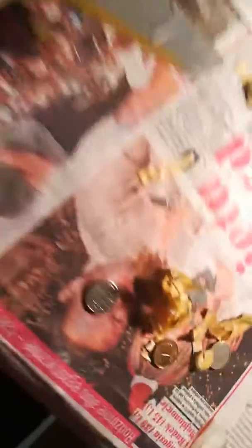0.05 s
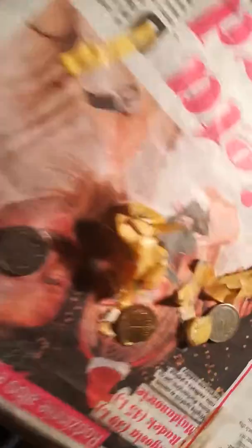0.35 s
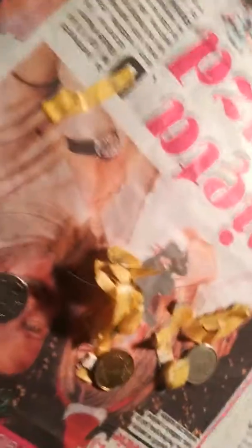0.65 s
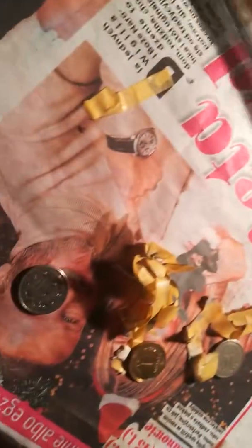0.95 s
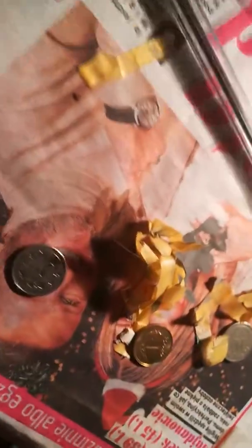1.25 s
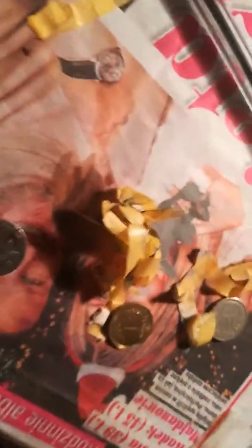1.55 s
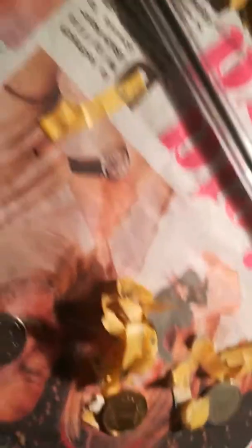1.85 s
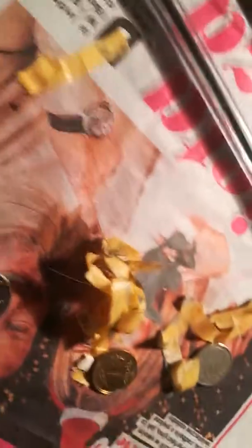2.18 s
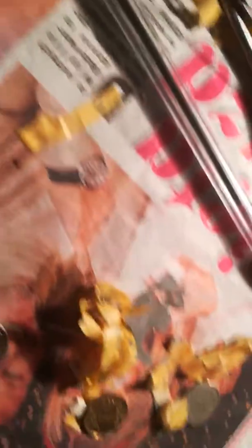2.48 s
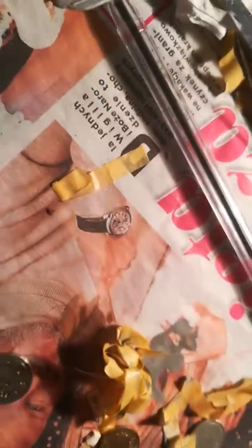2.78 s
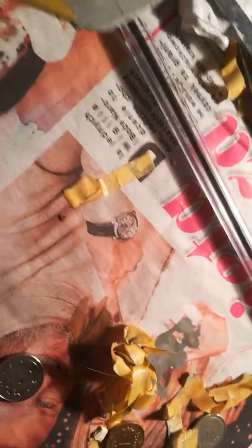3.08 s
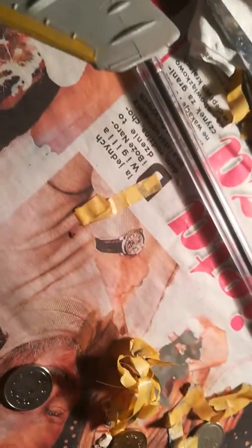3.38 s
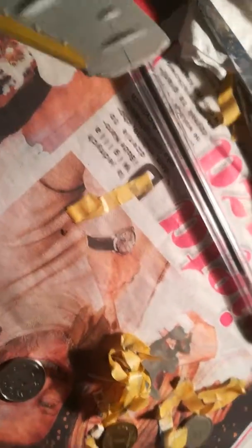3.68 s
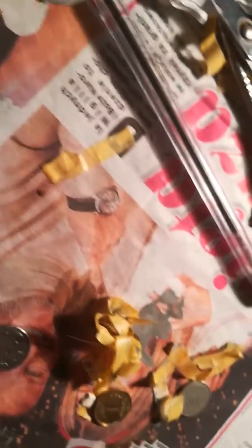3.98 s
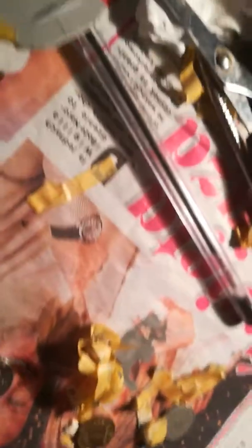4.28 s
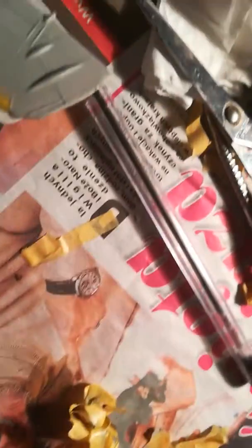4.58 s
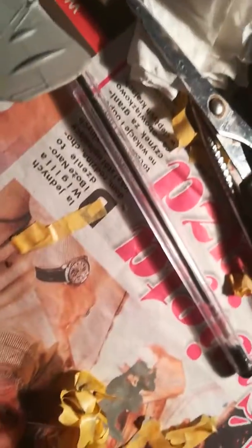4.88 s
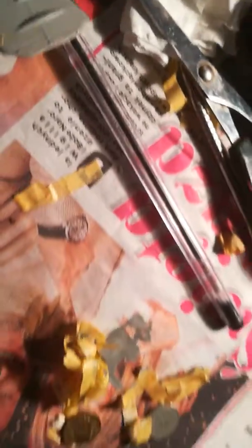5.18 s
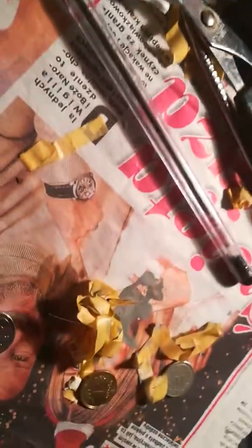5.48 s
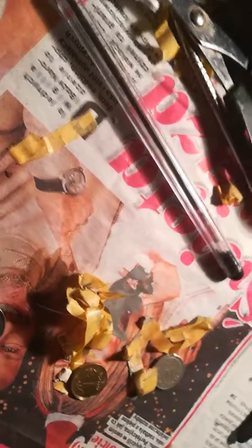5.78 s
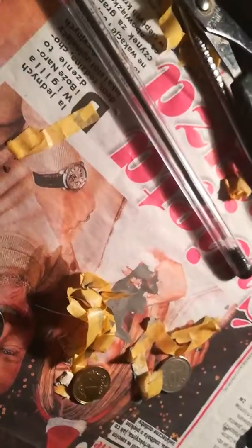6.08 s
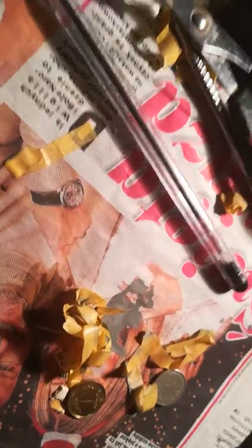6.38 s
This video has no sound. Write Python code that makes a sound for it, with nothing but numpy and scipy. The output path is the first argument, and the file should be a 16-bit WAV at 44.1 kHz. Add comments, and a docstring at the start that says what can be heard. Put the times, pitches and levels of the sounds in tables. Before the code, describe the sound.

Glossy magazine pages slide and crinkle on a workbench in a small room, close to a hand-held phone and brighter on the right. In the first second, soft bumps mix with papery swishes and a sharp crease near 0.9 seconds. Crisp snaps follow around 1.4 and 2 seconds, then irregular crackling continues to about 4 seconds, with a faint low rubbing on the bench. At 4.1 and 4.2 seconds things are set down with two dull thumps. At 4.3 seconds comes one hard knock, the loudest sound, which briefly rings the bench top and rattles small loose objects. The pages rustle on, and another dull thump lands near 5.6 seconds. A few lighter crinkles follow just after 6 seconds, and a small metal tool clinks with a soft bump at about 6.4 seconds. A faint room rumble lies underneath throughout.

```python
"""Glossy magazine pages slide, flex and crinkle on a workbench in a small room, close to a hand-held phone.
Soft bumps open the scene; fibres catch and slip in a hiss, bending sheets crackle and creases snap.
Just after 4 s things are set down: two dull thumps, then one hard knock that rings the bench top.
The pages rustle on, another thump lands near 5.6 s, and at the end a small metal tool clinks.
Throughout, the phone's right port faces the paper; the left one hears it later and duller."""
import sys
import numpy as np
from scipy import signal
from scipy.fft import rfft, irfft
from scipy.io import wavfile
from scipy.ndimage import uniform_filter1d, minimum_filter1d

SR = 44100
rng = np.random.default_rng(int(sys.argv[2]) if len(sys.argv) > 2 else 0)


def transcribe(u):
    """Save the signal u as a 16-bit wav file named by the first command-line argument.

    u: samples, shape (n,) or (channels, n), limited to [-1, 1]; the rate is SR.
    q: integer samples, one column per channel.
    """
    v = np.clip(np.atleast_2d(u).T, -1, 1)
    q = np.round(v * 32767).astype(np.int16)
    wavfile.write(sys.argv[1], SR, q)


N = 288414
TIME = np.arange(N) / SR

# tone of the room's rumble and the ports' hiss: frequency_hz, gain_db
ROOM_TONE_EQ = [(20, 4), (50, 14), (120, 2), (300, -4.5), (600, -18), (1500, -18.5), (3000, -21.5),
                (8000, -22.5), (16000, -25)]

# blows and soft bumps, brighter for hard things than for a hand: start_s, level_db, cutoff_hz
BENCH_HITS = [(0.047, -53, 497), (0.19, -47.5, 160), (0.393, -40, 1010), (0.613, -45.5, 253),
              (0.877, -43.5, 500), (1.031, -47, 67), (3.096, -36, 134), (4.094, -19, 382),
              (4.173, -21.5, 447), (4.291, -9.5, 2390), (4.47, -35, 196), (5.369, -44, 200),
              (5.574, -19.5, 256), (6.392, -36.5, 400), (6.469, -39, 393)]
# modes of the bench top with the things on it: pitch_hz, level_db, t60_s
BENCH_MODES = [(45.6, -9, 0.58), (84, -21, .12), (121.5, 4, 0.23), (181.7, 0, 0.2), (228, -4, 0.15),
               (287.3, -12, 0.22), (403, -1.5, 0.075), (452, -2.5, 0.064), (580, -8.5, 0.06),
               (737, -19.5, 0.065), (925, -20.5, 0.063), (947, -5, 0.11), (1036, -18.5, 0.17),
               (1130, -6, 0.095), (1250, -5.5, 0.015), (1335, -1.5, 0.12), (1346, -12, 0.19),
               (1478, 9, 0.028), (1660, -24, .1), (1810, -6.5, 0.049), (1936, -21, .04)]
# thud of the air a blow pushes: frequency_hz, gain_db
THUD_EQ = [(25, -26), (60, 0.5), (200, -6), (500, -1.5), (1000, 0.5), (1500, -1), (2000, -4.5),
           (2600, -27.5), (5000, -39), (12000, -59.5)]
# rattle of things lying on the bench: frequency_hz, gain_db
RATTLE_EQ = [(100, -15), (300, -4), (600, -29.5), (900, -11.5), (1400, -11.5), (2000, -3.5), (2600, -21.5),
             (5000, -36), (12000, -41.5)]

# light strokes that sing on glossy paper: middle_s, level_db, pitch_hz, half_length_s
LIGHT_STROKES = [(0.071, -59, 5800, 0.022), (3.592, -52.5, 4330, 0.085), (3.817, -50.5, 4040, 0.031)]
# pushes of one sheet over another: start_s, rise_s, length_s, hiss_db, sheen_db
SHEET_PUSHES = [(0.155, 0.056, 0.27, -49, -57), (0.43, 0.071, .16, -50, -55.5),
                (0.59, 0.13, 0.35, -49.5, -58), (1.345, 0.078, 0.14, -46, -56),
                (1.86, 0.0099, 0.074, -59.5, -77), (1.94, 0.051, 0.074, -47, -55),
                (2.98, 0.024, 0.18, -52.5, -69), (3.2, 0.029, 0.093, -61, -77),
                (3.59, .05, 0.1, -54.5, -69.5), (3.77, 0.13, 0.1, -48, -63), (3.94, 0.066, 0.24, -56, -71),
                (4.10, .11, .21, -43.5, -52), (4.36, 0.085, 0.13, -51, -68.5),
                (5.11, 0.037, 0.033, -59, -69), (5.44, 0.063, 0.082, -53.5, -76),
                (5.805, 0.049, 0.088, -57, -68), (5.9, .05, .18, -65.5, -74.5),
                (6.1, 0.055, 0.16, -59, -68)]
# hiss of slipping fibres: frequency_hz, gain_db
HISS_EQ = [(300, -33.5), (700, -16), (1100, -8.5), (2000, -3.5), (3300, 5.5), (5000, 7), (7000, 0.5),
           (9000, -11), (12000, -22), (16000, -38)]
# top-octave sheen of a fast stroke: frequency_hz, gain_db
SHEEN_EQ = [(3000, -33.5), (7000, -9.5), (9300, -7), (11500, -9), (13500, -13.5), (16000, -14)]

# bends of a sheet under the hand: start_s, rise_s, length_s, crackle_db, rub_db
SHEET_BENDS = [(0.17, 0.034, 0.13, -56, -56), (0.33, 0.017, 0.32, -57.5, -61), (0.66, 0.11, 0.27, -60, -67),
               (1.0, .04, 0.11, -74, -65.5), (1.36, 0.035, 0.13, -59.5, -54.5),
               (1.48, 0.028, 0.054, -71, -56), (1.86, 0.069, 0.19, -61, -69), (1.92, 0.046, 0.14, -60, -50),
               (2.05, .04, 0.2, -64, -57.5), (2.185, 0.021, 0.24, -53.5, -52.5),
               (2.44, 0.086, 0.26, -54.5, -71), (2.8, 0.019, .33, -53.5, -57),
               (3.15, 0.056, 0.13, -63, -74), (3.46, 0.049, 0.16, -70, -87), (3.6, .04, .09, -60.5, -64),
               (3.77, 0.026, 0.29, -57.5, -70.5), (3.89, 0.069, 0.37, -49.5, -51),
               (4.33, 0.075, 0.25, -54.5, -52.5), (4.6, 0.038, 0.087, -83.5, -60),
               (4.8, 0.029, .08, -67.5, -78), (4.88, 0.026, 0.11, -61.5, -70),
               (5.02, 0.027, 0.14, -55.5, -57.5), (5.16, 0.064, 0.34, -62.5, -66),
               (5.33, 0.096, 0.2, -50.5, -53), (5.6, 0.035, 0.3, -84, -63.5),
               (6.37, 0.025, 0.081, -57, -53)]
# crackle of a bending sheet: frequency_hz, gain_db
CRACKLE_EQ = [(150, -17), (350, 5.5), (600, -14), (1000, -0.5), (1500, 1.5), (2500, -8), (4000, -11),
              (8000, -35.5), (16000, -34)]
# rumble of the hand rubbing on the bench: frequency_hz, gain_db
RUB_EQ = [(20, -8), (45, -33), (80, 1.5), (125, 9.5), (200, -4), (350, -7.5), (550, -30.5), (1000, -45),
          (4000, -71)]

# loud creases snapping through: start_s, level_db, crisp_db, body_db, facet_hz, length_s
LOUD_CREASES = [(0.2378, -37.5, 2, -8.5, 3270, .006), (0.39, -34.5, 3, 8, 1140, .011),
                (0.5133, -35, 6, -7.5, 3500, .012), (0.8777, -26, -5.5, -8, 1930, .01),
                (0.9503, -40, 12, -24, 2910, .004), (1.408, -30, 14, -3, 4470, 0.02),
                (1.479, -30, 26, -17, 4800, .006), (1.873, -43, 3, -2.5, 2140, 0.026),
                (1.9943, -31.5, 17.5, -4.5, 5220, .011), (2.2012, -38.5, -18, -8, 1630, .009),
                (2.244, -44, -33, 2.5, 1270, .013), (2.329, -43.5, -8, -5, 1190, 0.012),
                (2.388, -44, 22, 15, 1640, .003), (2.4122, -28.5, 0, -1.5, 1210, .011),
                (2.4833, -29, -5.5, -12, 3300, .007), (2.539, -34.5, -6, -1, 1660, .009),
                (2.6285, -32, -15, -5.5, 1690, 0.0062), (2.8513, -31, -1, -3, 2800, .004),
                (2.971, -37, -3, -1, 3250, .005), (3.016, -36.5, -17, -1, 1540, .003),
                (3.038, -34, 11, -2, 4330, 0.01), (3.0527, -33.5, 9.5, -6, 4560, 0.01),
                (3.1067, -31.5, 14, -12, 4460, .009), (3.239, -38.5, -8, -5.5, 3230, .007),
                (3.606, -31.5, 6, -2, 2020, .008), (3.658, -38.5, 11, 0.5, 1750, .009),
                (3.912, -43, -28, -4, 1450, 0.0067), (4.004, -36, -9.5, 5, 1290, .013),
                (4.158, -33, 4.5, 2, 1880, .012), (4.242, -34.5, 13, 5, 1840, 0.01),
                (4.2902, -20.5, 3, 14, 1380, .006), (4.445, -24.5, 10.5, 6, 2120, 0.0053),
                (4.546, -30, -2, 3, 1950, .007), (4.8943, -37.5, 0.5, -1.5, 1480, .006),
                (4.9217, -34, -9, 2, 1490, .015), (4.954, -39, -17, 3, 1520, 0.0025),
                (5.0584, -37.5, -37, 10.5, 1310, .013), (5.108, -35.5, -6, 4.5, 1170, .014),
                (5.368, -43.5, 0.5, 8.5, 3480, .014), (5.4227, -37.5, -12, -12, 2650, 0.014),
                (5.4638, -29.5, 8, -8.5, 1720, .005), (5.638, -41, 0.5, 0, 4180, 0.005),
                (6.104, -48, 16.5, -5, 1720, 0.032), (6.168, -34.5, 23.5, -20, 4490, .006),
                (6.1947, -36, 17, -7, 4960, .007), (6.323, -46.5, 14, 3, 6150, .005)]
# snap common to all creases: frequency_hz, gain_db
SNAP_EQ = [(60, -8), (200, -4), (400, 2), (700, -4), (1200, 4), (2000, -0.5), (3200, 0.5), (4500, 4),
           (6500, -6.5), (9000, -16.5), (12000, -29), (16000, -44)]

# small loose things tapping: start_s, level_db, pitch_hz, t60_s
LOOSE_TAPS = [(1.019, -56.5, 1300, .05), (1.873, -46, 1114, 0.047), (1.882, -42.5, 367, 0.14),
              (3.604, -50.5, 357, 0.12), (4.158, -28, 1960, 0.023), (4.312, -25, 1431, .11),
              (4.339, -27.5, 1371, 0.12), (6.357, -39, 1525, 0.068), (6.367, -52, 1520, 0.04),
              (6.400, -37.5, 205.6, 0.17)]
# touches of the metal tool: start_s, level_db, cutoff_hz
TOOL_HITS = [(6.381, -37.5, 7000), (6.389, -30.5, 11100)]
# modes of the metal tool: pitch_hz, level_db, t60_s
TOOL_MODES = [(1623, 6.5, 0.029), (1690, -14, 0.47), (1980, 0, 0.014), (3560, -14, 0.037),
              (5800, -13, 0.15), (5960, -2.5, 0.13), (7100, -11.5, 0.15), (8500, -9, 0.1),
              (9200, -15, 0.13), (10100, -15, .13)]

# tone of the small room's tail: frequency_hz, gain_db
REVERB_EQ = [(60, -13), (150, -5), (350, -4), (1200, 0.5), (4000, -6), (8000, -4.5), (16000, -8.5)]
# response of the phone's two ports: frequency_hz, left_db, right_db
PORT_EQ = [(104, -7, -4.5), (386, 2.5, -0.5), (785, 9, 7.5), (1374, -7.5, 0), (2380, -2.5, 7),
           (4580, -20.5, -1.5), (8400, -23.5, 1.5), (16000, -13.5, -4)]

SLIDE_T60_S, BEND_T60_S = 0.21, 0.25  # a pushed sheet coasts to rest, a bent one settles
BEND_HISS_DB, BEND_SHEEN_DB = -12.5, -32  # a bending sheet also slips a little, relative to its crackle
PAPER_LAG_S, SLIDE_LAG_S = 0.00055, 0.0005  # the left port hears later


def amp(db):
    """Decibels to gain."""
    return 10 ** (np.asarray(db) / 20)


def unit(x):
    """Scale to rms 1."""
    return x / np.sqrt(np.mean(x ** 2))


def peaked(x, db):
    """Scale a hit so that its loudest 4 ms have this level."""
    return x * amp(db) / np.sqrt(uniform_filter1d(x ** 2, size=176, mode="constant").max())


def fade(t, t60):
    """Exponential decay by 60 dB in t60 seconds."""
    return np.exp(-np.log(1000) * t / t60)


def eq(x, points):
    """Causal filter through (frequency_hz, gain_db) points, by way of the cepstrum."""
    size = 4096
    hz, db = np.transpose(points)
    bins_hz = np.maximum(np.arange(size // 2 + 1) * SR / size, 1)
    gain = amp(np.interp(np.log(bins_hz), np.log(hz), db))
    cepstrum = irfft(np.log(gain))
    cepstrum[1:size // 2] *= 2
    cepstrum[size // 2 + 1:] = 0
    impulse_response = irfft(np.exp(rfft(cepstrum)))
    return signal.fftconvolve(x, impulse_response)[:len(x)]


def soften(x, cutoff_hz):
    """Low-pass: a soft contact pushes for longer and leaves the high modes alone."""
    return signal.sosfilt(signal.butter(2, min(cutoff_hz, .45 * SR), fs=SR, output="sos"), x)


def ring(modes, t):
    """Free ringing of a struck object; neighbouring modes start in opposite directions."""
    return sum((-1) ** k * amp(db) * fade(t, t60) * np.sin(2 * np.pi * hz * t)
               for k, (hz, db, t60) in enumerate(modes))


def grains(count, per_s, spread_db):
    """Tiny slips and buckles at random moments; with spread, most are small and a few large."""
    happens = rng.random(count) < per_s / SR
    sizes = amp(spread_db * np.minimum(rng.exponential(size=count), 4))
    return unit(happens * sizes * rng.choice([-1, 1], count) + 1e-9)


def flutter(per_s, depth_db, count=N):
    """A gain that wanders at random."""
    knots = rng.standard_normal(count)
    return amp(depth_db * np.interp(TIME[:count] * per_s, np.arange(count), knots))


def shifting(x, per_s, depth_db):
    """The contact patch moves, so each half-octave swells and fades on its own."""
    spectrum = rfft(x)
    bins_hz = np.maximum(np.arange(N // 2 + 1) * SR / N, 1)
    half_octaves = np.clip(2 * np.log2(bins_hz / 500), 0, 10)
    bands = (irfft(spectrum * np.maximum(1 - np.abs(half_octaves - k), 0), N) for k in range(11))
    return sum(band * flutter(per_s, depth_db) for band in bands)


def stroke_envelopes(table, t60):
    """Each stroke speeds up, holds and dies away; one envelope for each of the two level columns."""
    power = np.zeros((2, N))
    for start_s, rise_s, length_s, *levels_db in table:
        age = TIME - start_s
        attack = np.sin(np.pi / 2 * np.clip(age / rise_s, 0, 1)) ** 2
        release = fade(np.maximum(age - length_s, 0), t60)
        power += (amp(levels_db)[:, None] * attack * release) ** 2
    return np.sqrt(power)


def add(track, start_s, sound):
    """Mix a sound into a track at its cue."""
    start = max(int(start_s * SR), 0)
    track[start:start + len(sound)] += sound[:N - start]


def room_tone(level_db=-68):
    """A bed of faint room rumble shared by both ports, plus their own hiss."""
    rumble = soften(rng.standard_normal(N), cutoff_hz=350)
    hisses = [eq(rng.standard_normal(N), [(100, -11), (600, 10)]) for _ in range(2)]
    return np.array([amp(level_db) * unit(eq(rumble + hiss, ROOM_TONE_EQ)) for hiss in hisses])


def knocks():
    """Blows push the air, ring the bench top and briefly rattle what lies on it."""
    out, t = np.zeros(N), TIME[:SR]
    body = ring(BENCH_MODES, t)
    thud = peaked(eq(signal.unit_impulse(len(t)), THUD_EQ), db=6)
    for start_s, level_db, cutoff_hz in BENCH_HITS:
        rattle = unit(eq(rng.standard_normal(len(t)), RATTLE_EQ)) * fade(t, t60=.15)
        hit = soften(thud + body + amp(-7.5) * rattle, cutoff_hz)
        add(out, start_s, peaked(hit, level_db + .39))
    return out


def swishes():
    """A light, even stroke slips at a nearly steady rate and swells in one band."""
    out = np.zeros(N)
    for middle_s, level_db, hz, half_length_s in LIGHT_STROKES:
        band = eq(rng.standard_normal(N), [(hz / 1.5, -22), (hz, 0), (hz * 1.5, -22)])
        swell = np.exp(-((TIME - middle_s) / half_length_s) ** 2)
        out += amp(level_db) * unit(band) * swell
    return out


def sliding():
    """Paper on paper: fibres catch and slip thousands of times a second; fast strokes add a sheen."""
    hiss_gain, sheen_gain = stroke_envelopes(SHEET_PUSHES, SLIDE_T60_S)
    bending, _ = stroke_envelopes(SHEET_BENDS, BEND_T60_S)
    hiss_gain = np.hypot(hiss_gain, amp(BEND_HISS_DB) * bending)
    sheen_gain = np.hypot(sheen_gain, amp(BEND_SHEEN_DB) * bending)
    slips = grains(N, per_s=3500, spread_db=2.9) * flutter(per_s=110, depth_db=1.9)
    fine_slips = grains(N, per_s=14000, spread_db=2.2) * flutter(per_s=80, depth_db=1.2)
    slips = shifting(slips, per_s=22, depth_db=2.2)
    hiss = amp(2.5) * hiss_gain * unit(eq(slips, HISS_EQ))
    sheen = amp(8) * sheen_gain * unit(eq(fine_slips, SHEEN_EQ))
    return hiss + sheen


def flexing():
    """A bending sheet crackles in small spurts, while the hand's rubbing rumbles in the bench."""
    crackle_gain, rub_gain = stroke_envelopes(SHEET_BENDS, BEND_T60_S)
    buckles = grains(N, per_s=1500, spread_db=3.2) * flutter(per_s=90, depth_db=3)
    buckles = shifting(buckles, per_s=22, depth_db=2.2)
    drag = grains(N, per_s=900, spread_db=1.5) * flutter(per_s=18, depth_db=1.5)
    crackle = amp(-.5) * crackle_gain * unit(eq(buckles, CRACKLE_EQ))
    rub = amp(1.5) * rub_gain * unit(eq(drag, RUB_EQ))
    return crackle + rub


def small_creases(per_s=8, candidates=80):
    """Cues for small, dull creases that give way at random, their level riding the bending."""
    bending, _ = stroke_envelopes(SHEET_BENDS, BEND_T60_S)
    crisp_db, body_db, length_s = -17, 0, .007
    cues = []
    for when, chance, size, tuning in rng.random((candidates, 4)):
        if chance < per_s * TIME[-1] / candidates:
            start = int(when * N)
            level_db = 20 * np.log10(bending[start] + 1e-9) + 4.5 + 6 * size
            facet_hz = 1474 * 2 ** (tuning - .5)
            cues.append((TIME[start], level_db, crisp_db, body_db, facet_hz, length_s))
    return cues


def creases():
    """Each crease gives way in a short avalanche of buckles that rings the facet of paper beside it."""
    out, t = np.zeros(N), TIME[:SR // 8]
    lead_s = .025
    since_snap = np.maximum(t - lead_s, 0)
    # a faint crackle swells into each snap and softens its onset
    lead_in = amp(-8) * fade(np.abs(t - lead_s), t60=.016)
    shiver = amp(-14) * fade(since_snap, t60=.13) * (since_snap > 0)  # the sheet shivers afterwards
    for start_s, level_db, crisp_db, body_db, facet_hz, length_s in LOUD_CREASES + small_creases():
        progress = since_snap / length_s
        avalanche = 3 * progress ** .82 * np.exp(-2.5 * progress)
        spurts = flutter(per_s=500, depth_db=2, count=len(t))
        buckles = grains(len(t), per_s=9000, spread_db=0) * spurts * (lead_in + avalanche + shiver)
        # tight creases are crisp, wide ones have body
        tone = [(600, body_db), (1800, .0063), (4000, 0), (9000, crisp_db), (14000, 1.7 * crisp_db - 4.5)]
        facet = [(facet_hz / 1.35, 0), (facet_hz, 4.5), (facet_hz * 1.35, 0)]
        snap = eq(eq(buckles, SNAP_EQ), tone)
        add(out, start_s - lead_s - .001, peaked(eq(snap, facet), level_db - .3))
    return out


def taps():
    """A light contact rings one damped note, blurred by chatter against the paper."""
    out, t = np.zeros(N), TIME[:SR // 4]
    for start_s, level_db, hz, t60 in LOOSE_TAPS:
        chatter = unit(eq(rng.standard_normal(len(t)), [(hz / 2, -25), (hz, 0), (hz * 2, -25)]))
        note = np.sin(2 * np.pi * hz * t) + amp(-9.5) * chatter
        add(out, start_s, peaked(note * fade(t, t60), level_db + .3))
    return out


def clinks():
    """The metal tool touches lightly, then lands with a short scrape, bouncing in tiny steps as it rings."""
    out, t = np.zeros(N), TIME[:SR // 2]
    for start_s, level_db, cutoff_hz in TOOL_HITS:
        scrape = rng.standard_normal(len(t)) * (fade(t, t60=.04) + amp(-17) * fade(t, t60=.2))
        scrape = eq(scrape, [(1500, -4), (4000, -6.5), (10000, -1), (12500, -31)])
        chatter = flutter(per_s=350, depth_db=4, count=len(t))
        metal = ring(TOOL_MODES, t) * chatter + amp(5.5) * scrape
        add(out, start_s, peaked(soften(metal, cutoff_hz), level_db + .3))
    return out


def in_room(x, lag_s, reverb_db):
    """Direct sound at both ports, the left one late, each with its own tail of the small room."""
    t = TIME[:SR // 2]
    delayed = np.interp(TIME - lag_s, TIME, x)
    channels = []
    for direct in (delayed, x):
        tail = rng.standard_normal(len(t)) * fade(t, t60=.29) * (t > .006)  # 6 ms pre-delay
        tail = eq(tail / np.linalg.norm(tail), REVERB_EQ)
        channels.append(direct + amp(reverb_db) * signal.fftconvolve(x, tail)[:N])
    return np.array(channels)


def scene():
    """Paper, bench and tool, heard through the two ports; the phone's body shades the left one."""
    mix = in_room(creases() + flexing(), PAPER_LAG_S, reverb_db=-5)
    mix += in_room(sliding() + swishes(), SLIDE_LAG_S, reverb_db=-2)
    mix += in_room(knocks() + taps() + clinks(), PAPER_LAG_S, reverb_db=-9.5)
    ports = np.array(PORT_EQ)
    left = eq(mix[0], ports[:, [0, 1]])
    right = eq(mix[1], ports[:, [0, 2]])
    return np.array([left, right]) + room_tone()


def record(dry):
    """The phone drops the deepest rumble, limits any peak over its ceiling and cuts the top."""
    low_cut_hz, high_cut_hz, ceiling = 29, 15850, .95
    low_cut = signal.butter(2, low_cut_hz, "highpass", fs=SR, output="sos")
    high_cut = signal.ellip(12, .1, 90, high_cut_hz, fs=SR, output="sos")
    trimmed = signal.sosfilt(low_cut, dry)
    safe_gain = ceiling / np.maximum(np.abs(trimmed).max(axis=0), ceiling)
    limiter_gain = uniform_filter1d(minimum_filter1d(safe_gain, size=129), size=129)
    return signal.sosfilt(high_cut, trimmed * limiter_gain)


dry = scene()
out = record(dry)
transcribe(out)
```